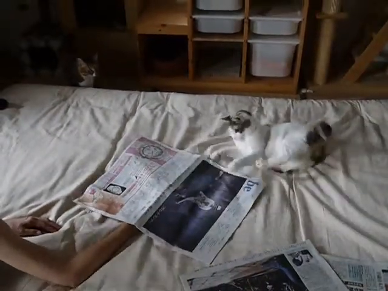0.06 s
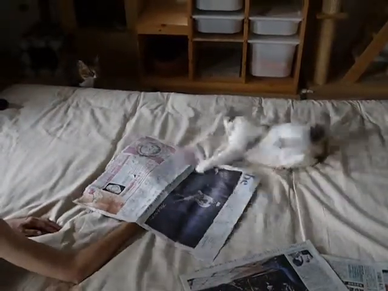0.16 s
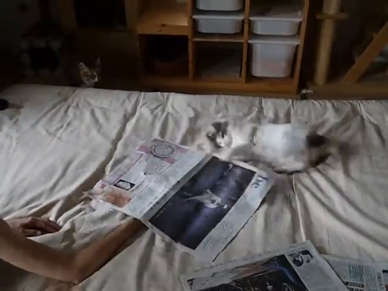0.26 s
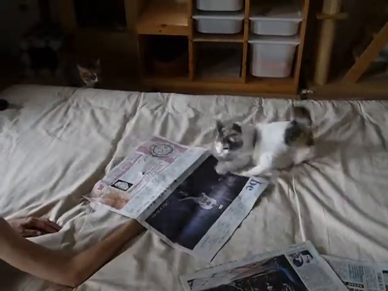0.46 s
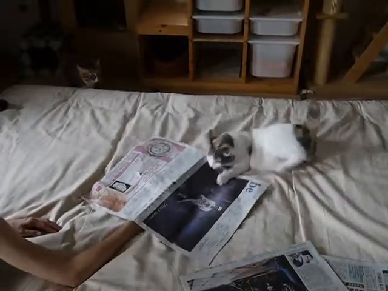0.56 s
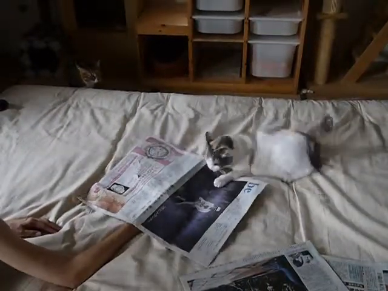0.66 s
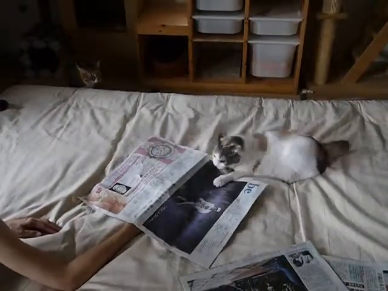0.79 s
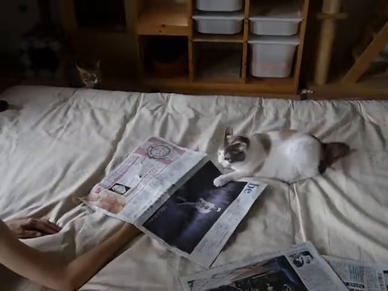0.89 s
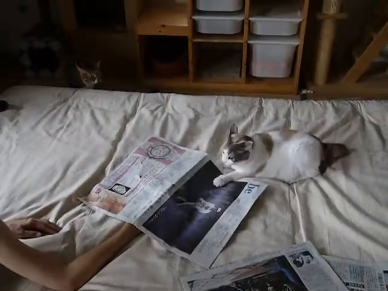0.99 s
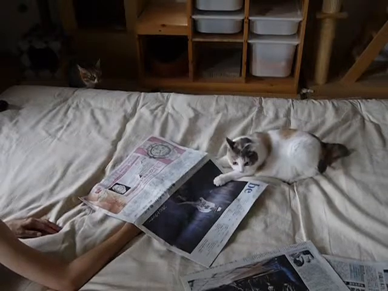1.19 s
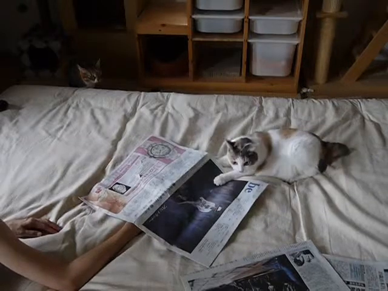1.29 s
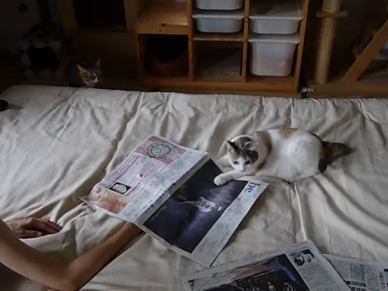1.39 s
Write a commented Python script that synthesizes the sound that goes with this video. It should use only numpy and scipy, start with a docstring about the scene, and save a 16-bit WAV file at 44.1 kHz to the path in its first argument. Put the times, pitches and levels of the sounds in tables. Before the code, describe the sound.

Newspaper rustles and crackles as a cat pounces and bats it on a bed.

```python
"""Newspaper rustles on a bed as a cat pounces and bats at it, heard on a closely spaced stereo pair.
Each paw blow slaps the sheet; the paper buckles in small pops, slides with a hiss, ticks at its creases.
The bedding stirs and the mattress thuds under the cat; the near walls of the small bedroom answer.
Behind it all lie quiet room tone and a faint whirr from the left, perhaps a fan."""
import sys
import numpy as np
from scipy import signal
from scipy.fft import rfft, irfft
from scipy.io import wavfile

SR = 44100
rng = np.random.default_rng(int(sys.argv[2]) if len(sys.argv) > 2 else 0)


def inscribe(sig):
    """Save sig as 16-bit PCM at rate SR to the path in sys.argv[1].

    A 1-D sig is mono; a 2-D sig holds one channel per row.
    Samples are clipped to [-1, 1] before scaling.
    """
    pcm = np.round(np.clip(np.atleast_2d(sig).T, -1, 1) * 32767)
    wavfile.write(sys.argv[1], SR, pcm.astype(np.int16))


N = 63945
T = np.arange(N) / SR

# shoves of the sheet: (time [s], rise [s], hold [s], release [s], buckle [dB], crunch [dB], slide [dB])
SHOVES = [(0, 0.00069, 0.0087, 0.031, -51, -54.5, -59), (0.073, 0.01, 0.026, 0.048, -64, -81, -64.5),
          (0.219, 0.0013, 0.0032, 0.015, -46.5, -62, -65), (0.244, 0.009, 0.041, 0.0048, -30, -34.5, -50),
          (0.265, 0.0024, 0.012, 0.013, -35, -27, -33.5), (0.324, .025, 0.019, 0.013, -38.5, -43.5, -44.5),
          (0.427, 0.0071, 0.039, 0.006, -32, -36.5, -42.5), (0.47, 0.0092, 0.005, 0.0068, -37, -34.5, -52),
          (0.52, 0.033, 0.046, 0.033, -54.5, -62, -76), (.574, 0.0092, 0.023, 0.013, -34.5, -43.5, -50),
          (0.672, 0.008, 0.015, 0.017, -47, -53, -52), (0.699, .015, 0.02, .014, -71, -58.5, -56.5),
          (0.766, 0.0071, 0.023, 0.063, -63.5, -64.5, -68), (0.831, 0.026, 0.018, 0.013, -51, -54, -59.5),
          (0.869, 0.011, 0.021, 0.044, -70, -65, -60), (0.937, 0.0062, 0.0058, 0.013, -46.5, -63, -72)]
# single creases snapping: (time [s], level [dB])
CREASE_SNAPS = [(.0125, -30), (.0875, -35.5), (.179, -41), (0.279, -15), (0.3209, -16.5), (.362, -25),
                (0.4559, -20.5), (0.478, -22), (0.671, -40)]
# spectra of the paper's four sounds: (frequency [Hz], relative level [dB])
BUCKLE_COLOUR = [(40, -41), (110, -21.5), (200, 0), (400, 1.5), (700, 4), (1000, -7), (1650, -13),
                 (2200, -14.5), (4000, -21.5), (8000, -50.5), (16000, -49)]
CRUNCH_COLOUR = [(100, -49.5), (600, -6), (1100, 3), (1700, 1), (2200, -8.5), (3500, -17.5), (5000, -16),
                 (8000, -21.5), (16000, -44.5)]
SLIDE_COLOUR = [(100, -12), (1000, -39), (2500, -0.5), (5000, 2), (6500, -5.5), (9500, 0.5), (11500, -8.5),
                (13000, -20), (16000, -44)]
CREASE_COLOUR = [(100, -33), (1300, 1), (3300, 2), (6200, -0.5), (8000, -3.5), (11000, -7), (13000, -23),
                 (16000, -26)]
# cloth stirring under the cat: (time [s], level [dB])
CLOTH_LEVELS = [(0, -39.5), (.11, -59.5), (.19, -51), (.5, -50.5), (.72, -53), (.82, -57), (.91, -49.5),
                (1.01, -56.5), (1.22, -54.5), (1.45, -55)]
# spectra of cloth, room tone and whirr: (frequency [Hz], relative level [dB])
CLOTH_COLOUR = [(30, -18), (90, -19), (160, -4.5), (380, -1.5), (550, -14.5), (1000, -20), (2000, -28.5),
                (5000, -38), (16000, -44)]
ROOM_TONE_COLOUR = [(15, 28), (45, -22), (90, 9.5), (200, -0.5), (600, -20), (2000, -17), (6000, -18.5),
                    (10000, -21.5), (13000, -28), (16000, -36)]
WHIRR_COLOUR = [(40, -15), (100, -5), (200, 0), (430, 1.5), (700, 0), (1200, -0.5), (2000, -9.5),
                (3500, -30), (5000, -16), (9000, -50), (16000, -40)]
# tones in the whirr: (frequency [Hz], level [dB])
WHIRR_TONES = [(88, -66), (1005, -66)]
# paw blows on the sheet; the pulse at 0.2753 s is the loudest slap's echo off a near wall:
# (time [s], level [dB], pitch [Hz], crack relative to the slap [dB])
SLAP_PULSES = [(.0045, -27.5, 616, -32), (.2484, -26.5, 750, -36), (0.2693, -6.5, 1240, -7.5),
               (.2753, -20, 700, -19), (0.4324, -15, 710, -16), (.4748, -37, 745, -10),
               (.5457, -30.5, 616, -32), (.5652, -33, 576, -37), (.5846, -28, 486, -26),
               (0.5923, -38.5, 730, 9), (.6013, -41, 605, -24), (.6037, -32, 494, -26),
               (0.667, -26.5, 650, -10), (.9418, -32, 630, -25)]
# paws and body on the mattress: (time [s], level [dB], pitch [Hz])
MATTRESS_THUDS = [(0.02, -35, 286), (0.162, -42, 269), (0.215, -26, 266), (0.236, -31.5, 219),
                  (.249, -34, 230), (.434, -28, 239), (.548, -33.5, 206), (0.587, -33.5, 223),
                  (.604, -31, 208), (0.621, -42, 264), (.936, -35.5, 231)]
# resonances of room and furniture: (frequency [Hz], relative level [dB], time to fall 60 dB [s])
RESONANCES = [(242, -24, .54), (349, -13, 0.51), (500, -6, 0.69), (645, -13, 0.22), (694, -26, .25),
              (826, -4, 0.3), (995, -7, 0.58), (1134, 4.5, 0.14), (1222, -4.5, 0.33), (1313, 1, 0.29),
              (1350, -1, 0.16), (1738, -5, 0.37)]
# first reflections off the near walls: (delay [s], level [dB])
WALL_ECHOES = [(.0062, -10), (.0079, -21), (0.0116, -17), (0.0166, -17)]
# decay of the bedroom: (frequency [Hz], time to fall 60 dB [s])
ROOM_DECAY = [(150, 0.22), (400, .48), (1000, 0.28), (3000, 0.41), (8000, 0.44), (16000, 0.75)]
# width of diffuse sound at the microphones: (frequency [Hz], side minus mid [dB])
MIC_WIDTH = [(30, -18), (80, -14), (170, -17), (500, -12.5), (1200, -4.5), (2800, -2), (6000, -2.5),
             (10000, -4), (15000, -0.5)]
# balance of the microphones: (frequency [Hz], left minus right [dB])
MIC_BALANCE = [(100, -0.5), (1500, 0.44), (5500, -1), (9000, 0), (13000, 2.5)]


def amp(db):
    """Decibels to gain."""
    return 10 ** (np.asarray(db) / 20)


def read(points, hz):
    """Reads a table along a logarithmic frequency axis."""
    f, value = np.transpose(points)
    return np.interp(np.log(hz + 1), np.log(f + 1), value)


def colour(x, points, size=2048):
    """Passes a sound through a causal filter of unit energy with the given spectrum."""
    log_gain = np.log(amp(read(points, abs(np.fft.fftfreq(size, 1 / SR)))))
    kernel = np.fft.ifft(np.exp(np.conj(signal.hilbert(log_gain)))).real
    return signal.fftconvolve(x, kernel / np.linalg.norm(kernel))[:N]


def add(mix, start_s, sound):
    """Adds a sound to the mix at a time."""
    part = mix[max(round(start_s * SR), 0):][:len(sound)]
    part += sound[:len(part)]


def mic_pair(x):
    """Turns two unrelated signals into diffuse sound at two closely spaced microphones."""
    mid, side = rfft(x)
    width = amp(read(MIC_WIDTH, np.fft.rfftfreq(x.shape[1], 1 / SR)))
    return irfft(np.array([mid + width * side, mid - width * side]) / np.hypot(1, width), x.shape[1])


def wash(points):
    """Coloured noise reaching the microphones from all round."""
    return mic_pair(np.array([colour(noise, points) for noise in rng.standard_normal((2, N))]))


def clicks(per_s, spread_db):
    """Random clicks of uneven size, rms one."""
    size = amp(spread_db * np.minimum(rng.exponential(1, N), 4))
    train = size * rng.choice([-1, 1], N) * (rng.random(N) < per_s / SR)
    return train / np.sqrt(np.mean(train ** 2) + 1e-20)


def bedroom(x, wet_db, gap_s=0.0031, size=24576):
    """Direct sound, reflections off the near walls and a diffuse tail that dies band by band."""
    hz, t, bands = signal.stft(rng.choice([-1., 1.], (2, size)), SR, nperseg=256)
    decay = amp(-60 * t / read(ROOM_DECAY, hz)[:, None])
    tail = mic_pair(signal.istft(bands * decay, SR, nperseg=256)[1])
    tail *= np.clip(T[:size] / gap_s - 1, 0, 1)
    response = amp(wet_db) * tail / np.linalg.norm(tail[0])
    response[:, 0] += 1
    for delay, db in WALL_ECHOES:
        response[:, round(delay * SR)] += amp(db)
    return signal.fftconvolve(np.atleast_2d(x), response, axes=1)[:, :N]


def ringing(x, gain_db):
    """Narrow resonances of room and furniture sing on after a blow."""
    modes = sum(amp(db - 60 * T / t60) * np.sin(2 * np.pi * (hz * T + rng.random()))
                for hz, db, t60 in RESONANCES)
    return amp(gain_db) * signal.fftconvolve(x, modes)[:N]


def paper(wet_db=-3, sheet_width=0.59, snap_s=0.00083):
    """Each shove sets off dull buckling pops, a brighter crunch and sliding grains; creases snap."""
    power = np.zeros((3, N))
    for start, rise, hold, release, *levels_db in SHOVES:
        attack = np.clip((T - start) / rise, 0, 1)
        fade = np.exp(-np.maximum(T - start - rise - hold, 0) / release)
        power += (amp(levels_db)[:, None] * attack * fade) ** 2
    buckling, crunching, sliding = np.sqrt(power)
    pops = colour(buckling * clicks(per_s=2600, spread_db=2.5), BUCKLE_COLOUR)
    pops += colour(crunching * clicks(per_s=2600, spread_db=2.5), CRUNCH_COLOUR)
    mid, side = (colour(sliding * clicks(per_s=4700, spread_db=4), SLIDE_COLOUR) for _ in range(2))
    hiss = mic_pair(np.array([mid, sheet_width * side]))  # width 0: from one point, 1: from all over
    rustle = (pops + hiss) / np.hypot(1, amp(wet_db))
    snaps = np.zeros(N)
    for start, db in CREASE_SNAPS:
        burst = rng.choice([-1, 1], N) * np.exp(-T / snap_s)
        add(snaps, start, amp(db) * burst / np.linalg.norm(burst))
    return bedroom(rustle + colour(snaps, CREASE_COLOUR), wet_db) + ringing(pops, gain_db=-60.5)


def bedding():
    """Cloth rubs softly as the cat shifts its weight."""
    return amp(np.interp(T, *np.transpose(CLOTH_LEVELS))) * wash(CLOTH_COLOUR)


def whirr(rush_db=-59, lead_s=0.00029):
    """A steady soft rush with two faint tones; it reaches the left microphone first."""
    left = amp(rush_db) * colour(rng.standard_normal(N), WHIRR_COLOUR)
    left += sum(amp(db) * np.sin(2 * np.pi * hz * T) for hz, db in WHIRR_TONES)
    delay = np.exp(-2j * np.pi * np.fft.rfftfreq(N, 1 / SR) * lead_s)
    return np.array([left, irfft(rfft(left) * delay, N)])


def room_tone(level_db=-56.5):
    """The quiet of the bedroom: low rumble and a trace of hiss from all round."""
    return amp(level_db) * wash(ROOM_TONE_COLOUR)


def air_pulse(peak_s, hz):
    """One smooth push of air between two shallow dips, strongest at the given pitch."""
    spread = (np.pi * hz * (T - peak_s)) ** 2
    return (1 - 2 * spread) * np.exp(-spread)


def paw_slaps(crack_hz=4540, crack_lag_s=0.00024):
    """A paw drives the sheet down: an air pulse with a sharp crack. One pulse is a slap's wall echo."""
    pulses = np.zeros(N)
    for peak_s, db, hz, crack_db in SLAP_PULSES:
        crack = amp(crack_db) * air_pulse(peak_s + crack_lag_s, crack_hz)
        pulses += amp(db) * (air_pulse(peak_s, hz) + crack)
    return bedroom(pulses, wet_db=-2.5) + ringing(pulses, gain_db=-51.5)


def mattress_thuds(rise_cycles=0.55, low_cut_hz=140):
    """The mattress takes a paw with two or three soft, low swings."""
    thuds = np.zeros(N)
    for start, db, hz in MATTRESS_THUDS:
        age = T * hz / rise_cycles
        add(thuds, start, amp(db) * age * np.exp(1 - age) * np.sin(2 * np.pi * hz * T))
    low_cut = signal.butter(2, low_cut_hz, "high", fs=SR, output="sos")
    return bedroom(signal.sosfilt(low_cut, thuds), wet_db=-5)


def scene():
    """The cat on the bed and the quiet room around it, as they reach the microphones."""
    return paper() + bedding() + whirr() + room_tone() + paw_slaps() + mattress_thuds()


def record(dry):
    """Slightly unequal microphones, a low cut at 22 Hz and a band limit at 15.7 kHz."""
    lean_db = read(MIC_BALANCE, np.fft.rfftfreq(2 * N, 1 / SR)) / 2
    heard = irfft(rfft(dry, 2 * N) * amp([lean_db, -lean_db]))[:, :N]
    heard = signal.sosfilt(signal.butter(2, 22, "high", fs=SR, output="sos"), heard)
    band_limit = signal.firwin(511, 15700, window=("kaiser", 9), fs=SR)
    return signal.oaconvolve(heard, band_limit[None], "same")


dry = scene()
out = record(dry)
inscribe(out)
```